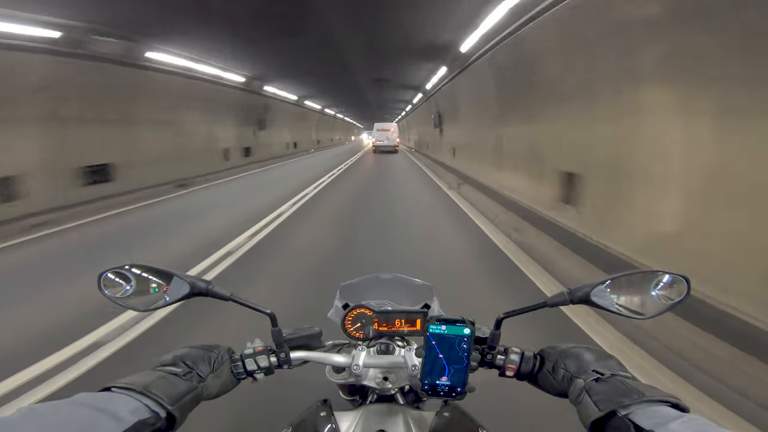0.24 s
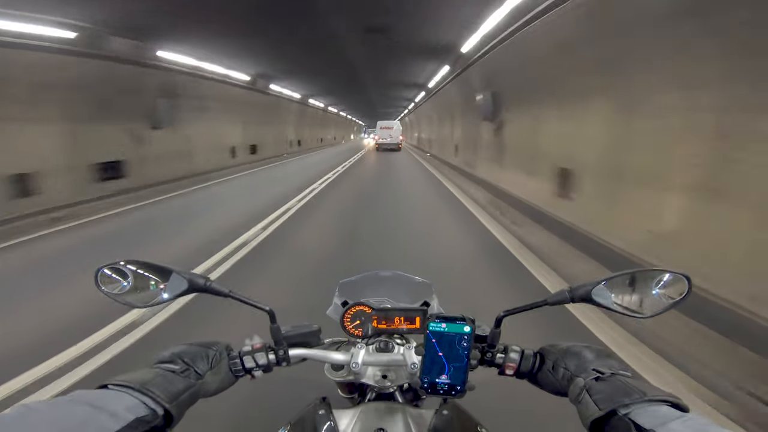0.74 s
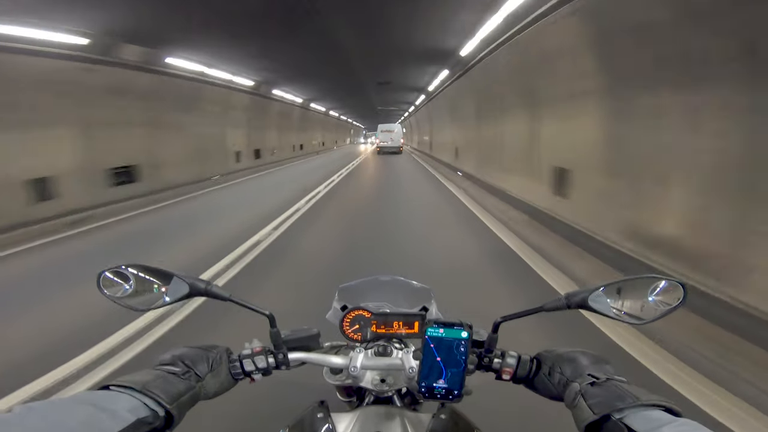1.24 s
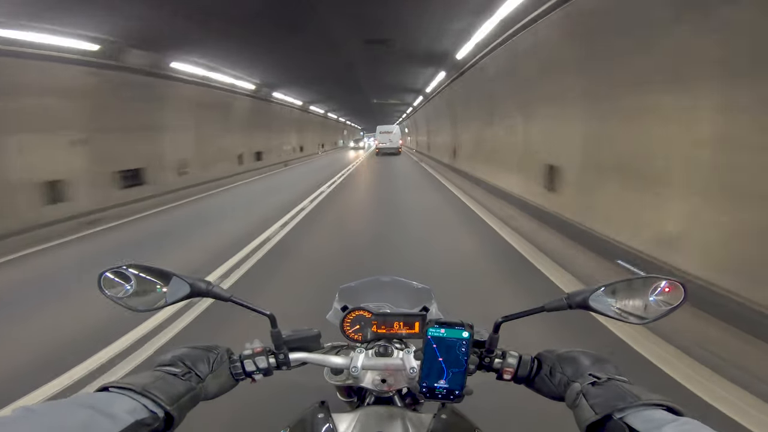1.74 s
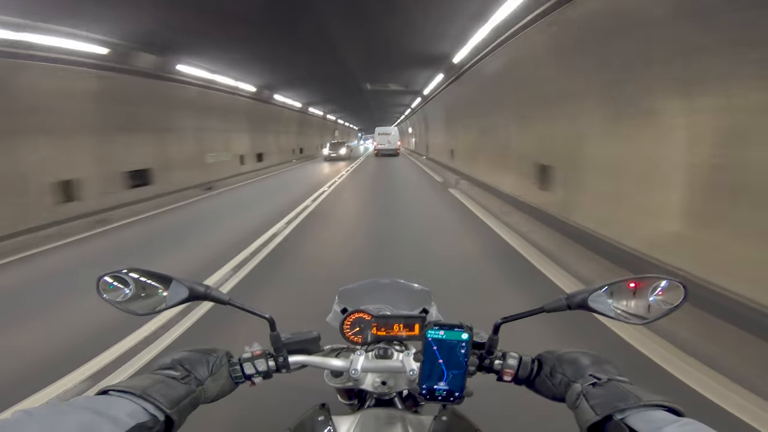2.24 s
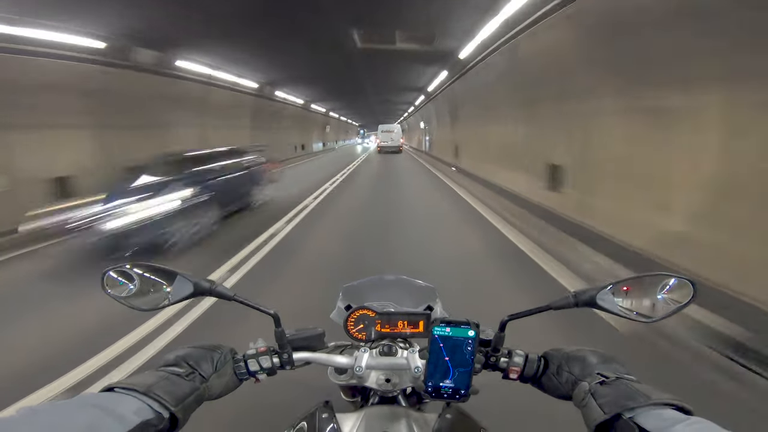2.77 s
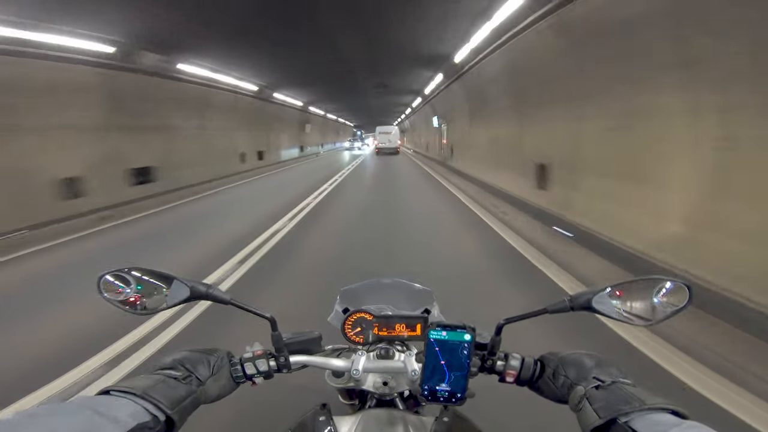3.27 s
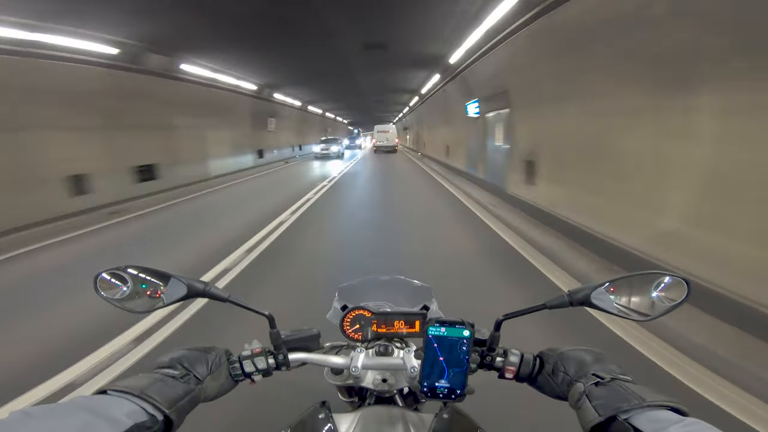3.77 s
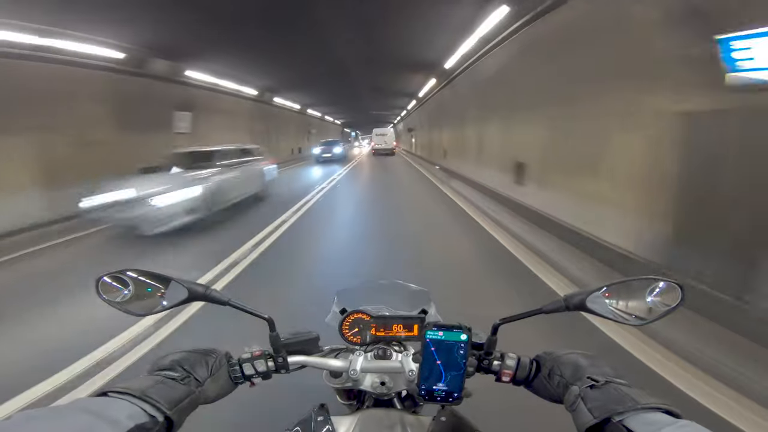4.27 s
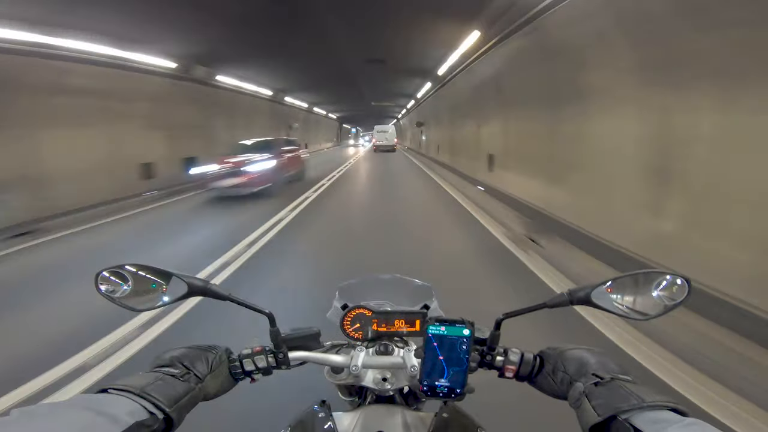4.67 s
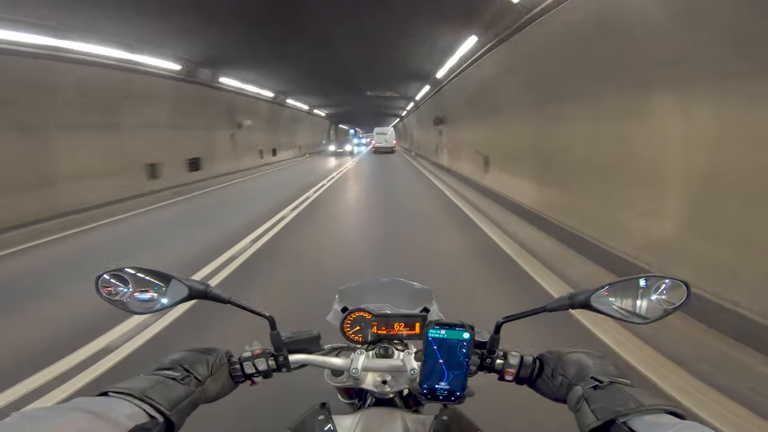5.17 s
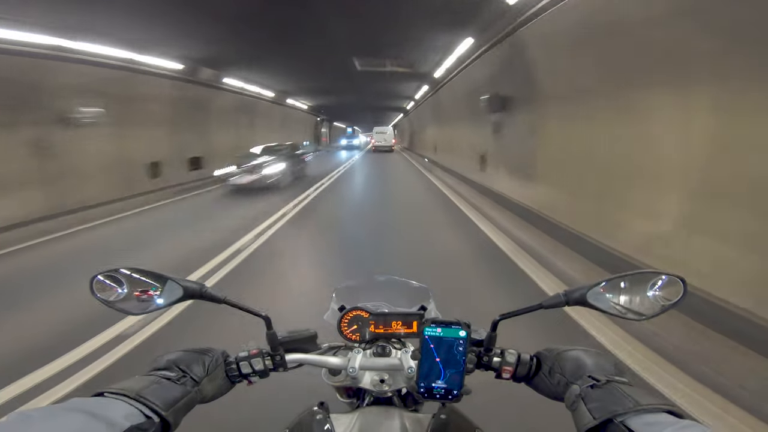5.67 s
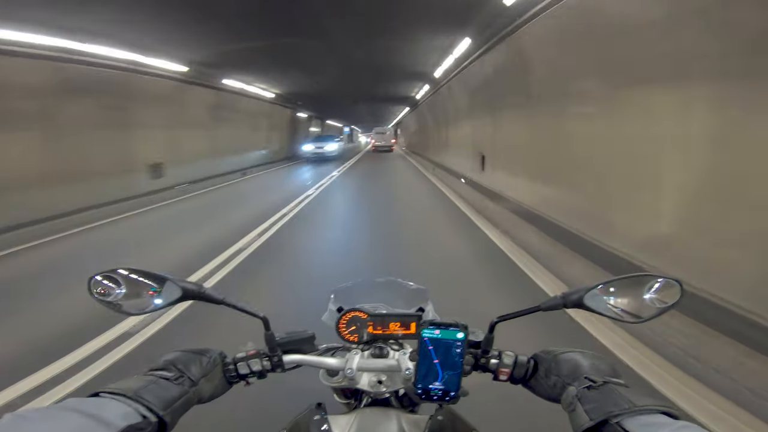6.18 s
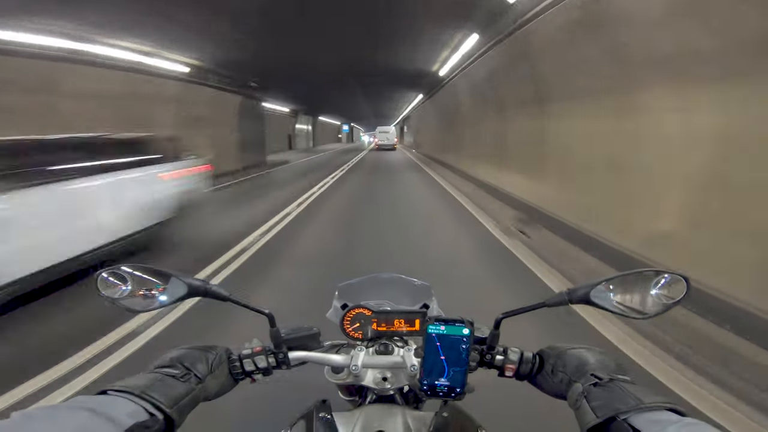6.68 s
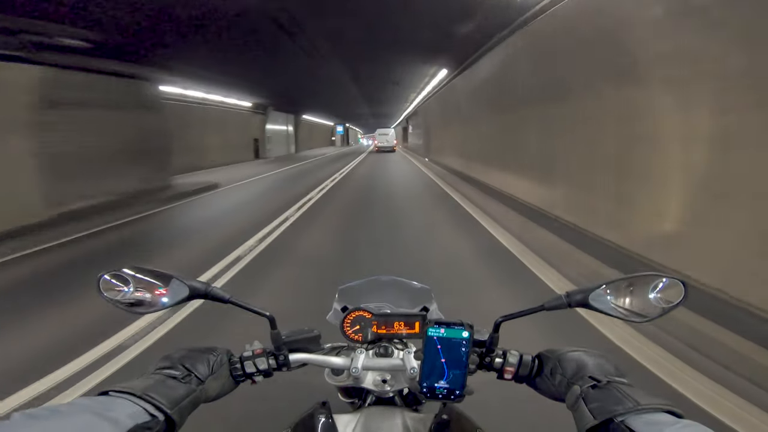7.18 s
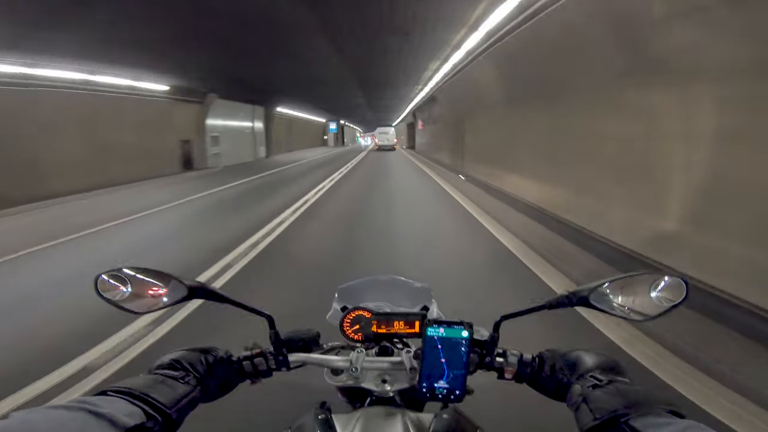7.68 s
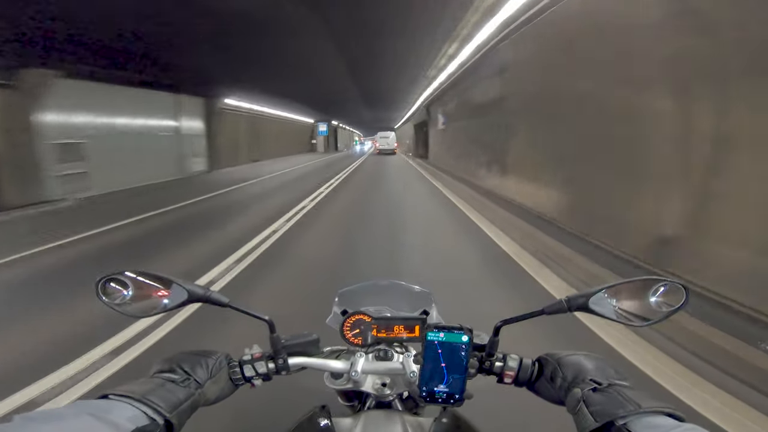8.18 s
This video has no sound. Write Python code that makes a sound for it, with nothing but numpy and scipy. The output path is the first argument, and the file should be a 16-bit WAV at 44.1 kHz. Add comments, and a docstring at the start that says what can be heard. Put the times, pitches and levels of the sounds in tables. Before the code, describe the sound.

A twin-cylinder motorcycle cruises through a road tunnel, heard from the rider's chest. The engine hums and growls, with light knocking, thin gear whine and ticking valves. Tyre roar fills the tunnel and wind thumps on the microphone. Five oncoming cars rush past slightly to the left. In the second half the throttle opens, and the engine note slowly climbs and hardens into a pulsing drone.

```python
"""A road tunnel, stereo microphone on the chest of a motorcyclist. At first the twin cruises just below:
the firings hum and knock, the airbox growls, gears whine and valves tick. Tyre roar fills the tube and
wind thumps on the microphone. From about 3 s five oncoming cars rush by on the left. Near 5 s the throttle
rolls open and the revs creep up; the note hardens to a drone, beating with the teeth of the final drive."""
import sys
import numpy as np
from scipy.fft import rfft, irfft, next_fast_len
from scipy.io import wavfile
from scipy.ndimage import uniform_filter1d, map_coordinates

SR = 44100
rng = np.random.default_rng(int(sys.argv[2]) if len(sys.argv) > 2 else 0)


def store_wav(level_fs):
    """Save 16-bit WAV to argv[1]."""
    pcm = np.round(np.clip(np.atleast_2d(level_fs), -1, 1) * 32767)
    wavfile.write(sys.argv[1], SR, pcm.T.astype(np.int16))


N = 371322
TIME = np.arange(N) / SR


def amp(db):
    """Decibels to gain."""
    return 10 ** (np.asarray(db) / 20)


def unit(x):
    """Scale to rms 1."""
    return x / np.sqrt(np.mean(x ** 2) + 1e-20)


def along(points, hz):
    """Read (f/Hz, value) points on a log frequency axis."""
    f, v = np.transpose(points)
    return np.interp(np.log(hz + 1), np.log(f + 1), v)


def wobble(rate):
    """A smooth random curve, rate knots a second."""
    knots = rng.standard_normal(int(N * rate / SR) + 4)
    coarse = np.arange(0, N + 64, 64)
    return np.interp(np.arange(N), coarse, map_coordinates(knots, [coarse * rate / SR]))


def swell(middle_s, width_s):
    """A bell-shaped rise and fall, 1 at its top."""
    return np.exp(-((TIME - middle_s) / width_s) ** 2)


def filtered(x, response):
    """Pass x through a complex frequency response."""
    m = next_fast_len(N + SR // 2)
    return irfft(rfft(x, m) * response(np.fft.rfftfreq(m, 1 / SR)), m)[..., :N]


def resonances(modes, f):
    """Causal response of (f/Hz, width/Hz, level/dB) modes."""
    return sum((-1) ** k * amp(db) * 1j * f * w / (c * c - f * f + 1j * f * w)
               for k, (c, w, db) in enumerate(modes))


def ringing(modes, f):
    """Gain of unrelated (f/Hz, width/Hz, level/dB) modes, added in power."""
    return np.sqrt(sum(amp(db) ** 2 / (1 + ((f - c) / (w / 2)) ** 4) for c, w, db in modes))


def stereo_noise(spread):
    """White noise common to both microphone ports, plus spread times each port's own."""
    return rng.standard_normal(N) + spread * rng.standard_normal((2, N))


CRUISE_HZ = 41.88  # crank turns a second at the start
def crank_speed(sag_hz_per_s, pull_s, pull_hz_per_s, ease_s):
    """Turns a second: a slow sag, overtaken by a steady climb as the engine pulls."""
    pulling_s = ease_s * np.logaddexp(0, (TIME - pull_s) / ease_s)
    return CRUISE_HZ - sag_hz_per_s * TIME + pull_hz_per_s * pulling_s


# The rider's twist grip: t/s, opening/0-1
TWIST_GRIP = [(0, 0.01), (2, 0.07), (3.4, 0.08), (4.7, 0.11), (5.4, .22), (5.95, .46), (6.45, .58),
              (6.85, 0.81), (7.3, 0.88), (7.95, 1), (8.4, 0.9)]
def throttle_opening():
    """Held nearly shut, rolled on to wide open, then eased a little."""
    return np.clip(np.interp(TIME, *np.transpose(TWIST_GRIP)), 0, 1)


# Engine note at the chest: multiple of crank speed, level/dB shut, half open, wide open, left-right/dB
ENGINE_ORDERS = [(1, -44.5, -40.5, -37.5, -0.5), (2, -35, -33.5, -32, 1), (3, -40, -33.5, -33.5, -0.5),
                 (3.5, -48, -57.5, -43.5, 1.5), (4, -39.5, -45, -46, 4.5), (5, -53, -48.5, -42.5, 1.5),
                 (5.5, -48.5, -43, -39, -3), (6, -41.5, -34.5, -33.5, 1.5), (6.5, -47.5, -53.5, -58, 7),
                 (7, -45.5, -42, -32.5, -4.5), (7.5, -51.5, -43, -52.5, -4), (8, -43, -43.5, -32, -9),
                 (8.5, -52, -53.5, -38, -4), (9, -49.5, -39.5, -52, 0.5), (10, -43, -43.5, -50, -4)]
# Brief dips of the fifth order and above: t/s, level/dB, half width/s
UPPER_DIPS = [(1.3, -5.5, .2), (3.1, -7, 0.18)]
def engine_note(turns, throttle, flutter_db, burble_db, sway, smear, lag_s):
    """One firing a turn gives whole orders; the unequal cylinders add half orders."""
    out = np.zeros((2, N))
    dip_db = sum(db * swell(s, width) for s, db, width in UPPER_DIPS)
    wavering = 1 - .65 * throttle  # load steadies the note
    burble = burble_db * wavering * wobble(30)  # no two firings are equally strong
    for order, shut_db, half_db, open_db, lean_db in ENGINE_ORDERS:
        db = np.interp(throttle, [0, .5, 1], [shut_db, half_db, open_db])
        db += burble + dip_db * (order >= 5)
        # echoes off the passing walls make every line waver, the short waves most
        level = amp(db + flutter_db * wavering * np.sqrt(order) * wobble(12))
        drift = sway * order * wavering * wobble(6)
        # high orders arrive later, which smears each firing over the whole turn
        phase = 2 * np.pi * order * (turns - smear * order / 2) + drift
        phase += np.pi * (order % 1)  # half orders shift the firings' timing more than their size
        late = np.pi * order * CRUISE_HZ * lag_s  # the right port hears it first
        for side, sign in enumerate((1, -1)):
            out[side] += np.sqrt(2) * level * amp(sign * lean_db / 2) * np.cos(phase - sign * late)
    return out


def final_drive(turns, throttle, meshes_per_turn, db, open_db, flutter_db):
    """The drive teeth mesh just above the sixth order and beat against it, louder when pulling."""
    level = amp(db + open_db * np.sqrt(throttle) + flutter_db * wobble(4.1))
    return np.sqrt(2) * level * np.cos(2 * np.pi * meshes_per_turn * turns + 0.34 * wobble(3.5))


# Gear and cam chain tones: multiple of crank speed, level/dB shut, half open, wide open
GEAR_ORDERS = [(19.4, -58.5, -64.5, -69.5), (19.7, -68.5, -60, -54), (28.5, -60.5, -64, -64.5),
               (31.86, -67, -61, -60.5), (32.9, -64, -63.5, -57.5), (34.4, -63.5, -66, -68.5),
               (37.4, -58, -58.5, -67), (39.8, -75.5, -63, -62.5), (41.9, -68, -63, -63),
               (46.2, -63, -59, -73), (63, -66, -67, -73), (69, -74, -73, -72), (91, -79, -78.5, -79),
               (121.5, -82.5, -87, -92)]
def gear_whine(turns, throttle, steady, rate_per_order, apart_rad):
    """Thin gear and chain tones follow the revs; the higher they lie, the faster they flutter."""
    out = np.zeros((2, N))
    for order, shut_db, half_db, open_db in GEAR_ORDERS:
        level = amp(np.interp(throttle, [0, .5, 1], [shut_db, half_db, open_db]))
        rate = rate_per_order * order
        flutter = (steady + wobble(rate) + 1j * wobble(rate)) / np.sqrt(steady ** 2 + 2)
        phase = 2 * np.pi * order * turns + np.angle(flutter)
        port_shift = apart_rad * wobble(22) * np.array([[1], [-1]])
        out += np.sqrt(2) * level * abs(flutter) * np.cos(phase + port_shift)
    return out * amp([[-1], [1]])


# Airbox resonances, close under the microphone: f/Hz, width/Hz, relative level/dB
AIRBOX_MODES = [(259, 40, -2), (338.5, 84, -4), (414.3, 42, -6)]
# Brief surges of the growl: t/s, level/dB
GROWL_SURGES = [(.12, 5), (.91, 6.5), (1.25, 7.5), (1.64, 7), (1.79, 4), (2.53, 6), (2.9, 9.5), (3.6, 2),
                (3.87, 7), (4.68, 3), (4.81, 3), (5.58, 5)]
def intake(turns, throttle, db, open_db, decay_turns, echo, surge_db, lope, muffle_hz):
    """Each intake stroke gulps a ragged puff of air that rings the airbox."""
    puffs = (echo + np.exp(-(turns % 1) / decay_turns)) * rng.standard_normal(N)
    growl = unit(filtered(puffs, lambda hz: resonances(AIRBOX_MODES, hz) / (1 + (hz / muffle_hz) ** 4)))
    growl *= 1 + lope * np.cos(np.pi * turns)  # one cylinder gulps harder than the other
    surging = surge_db * wobble(13) + sum(size * swell(s, width_s=0.032) for s, size in GROWL_SURGES)
    return growl * amp(db + open_db * throttle + surging) * amp([[-1.2], [1.2]])


# Cylinder block resonances: f/Hz, width/Hz, relative level/dB shut, wide open
BLOCK_MODES = [(1526, 140, 8.5, 13.5), (1783, 130, 6, 10), (1904, 71, 6.5, 9), (2028, 100, 4.5, 5.5),
               (2188, 140, -1, 3), (2360, 150, -3, -9)]
def combustion(turns, throttle, db, decay_turns, echo, spread):
    """Each firing knocks on the block; load brings out its lower resonances."""
    knocks = (echo + np.exp(-(turns % 1) / decay_turns)) * stereo_noise(spread)
    shut_modes = [(hz, width, shut_db) for hz, width, shut_db, _ in BLOCK_MODES]
    open_modes = [(hz, width, open_db) for hz, width, _, open_db in BLOCK_MODES]
    light = filtered(knocks, lambda hz: ringing(shut_modes, hz))
    loaded = filtered(knocks, lambda hz: ringing(open_modes, hz))
    return (light + throttle * (loaded - light)) / light.std() * amp(db) * amp([[-1.2], [1.2]])


# Valve and chain contacts: place in the four-stroke cycle/0-1, relative level/dB
VALVE_CONTACTS = [(.07, -5), (.34, -8), (.56, -10.5), (.69, -9.5), (.88, -9)]
# Valve and chain cover resonances: f/Hz, width/Hz, relative level/dB
COVER_MODES = [(2533, 170, -0.5), (2627, 60, -0.5), (2836, 150, -3), (3250, 160, -13.5), (3450, 140, -6.5),
               (3757, 140, -9), (3920, 130, -13.5), (4180, 200, -19.5), (4450, 220, -18.5),
               (4810, 130, -23.5), (5060, 120, -16), (5530, 150, -24.5), (5860, 140, -25.5),
               (6060, 130, -21.5), (6440, 160, -28), (6900, 160, -31.5), (7190, 260, -30),
               (8350, 300, -39.5), (8760, 180, -38.5), (9500, 340, -37.5)]
# Spectrum of a valve tick: f/Hz, relative level/dB
TICK_SPECTRUM = [(1000, -22), (2500, 5), (4000, -5.5), (6000, -8), (8300, -13.5), (9300, -16.5),
                 (10300, -21), (12000, -16.5), (13400, -21.5)]
def valve_gear(turns, throttle, ring_db, tick_db, open_db, decay_cycles, scatter_db, chain, spread):
    """Valves seat at set points of the cycle over the whirr of the chain; they tick and ring the covers."""
    cycles = turns / 2
    blows = np.full(N, chain)
    for place, db in VALVE_CONTACTS:
        since = cycles - place + 1
        sizes = amp(db + scatter_db * rng.standard_normal(size=256))
        blows += sizes[since.astype(int)] * np.exp(-(since % 1) / decay_cycles)
    rattle = blows * stereo_noise(spread)
    ring = unit(filtered(rattle, lambda hz: ringing(COVER_MODES, hz))) * amp([[-1], [1]])
    ticks = unit(filtered(blows * rng.standard_normal(N), lambda hz: amp(along(TICK_SPECTRUM, hz))))
    return amp(ring_db) * ring + amp(tick_db + open_db * throttle) * ticks


# Likeness of the tunnel's sound at the two ports: f/Hz, coherence/0-1
PORT_COHERENCE = [(60, .9), (93, .82), (150, 1), (230, .75), (350, 0.63), (550, 0.92), (850, 0.83),
                  (1330, 0.66), (2060, 0.76), (3210, .72)]
# Its balance: f/Hz, left-right/dB
PORT_BALANCE = [(60, 5), (86, -2), (120, 3), (180, -4.5), (260, 0.5), (370, 0), (530, -2), (760, -2),
                (1080, -1.5), (1560, 0), (2240, -4), (3210, -3.5)]
# Its phase: f/Hz, lead of the left port/rad
PORT_LEAD = [(120, -0.0083), (260, -0.42), (370, -0.24), (480, -.4), (600, -.2), (900, 0.12), (1300, 0.071),
             (3200, -.5), (5000, 0)]
def tunnel_noise(spectrum):
    """Noise of rms 1 arriving from the tube, as the two microphone ports pick it up."""
    def mid_and_side(hz):
        angle = np.arccos(np.clip(along(PORT_COHERENCE, hz), -1, 1)) / 2
        return amp(along(spectrum, hz)) * np.array([np.cos(angle), np.sin(angle)])

    def placing(hz):
        halves = np.array([[.5], [-.5]])
        return amp(halves * along(PORT_BALANCE, hz)) * np.exp(1j * halves * along(PORT_LEAD, hz))
    mid, side = filtered(rng.standard_normal((2, N)), mid_and_side)
    return unit(filtered(np.array([mid + side, mid - side]), placing))


# Tyres and traffic, all around in the tube: f/Hz, relative level/dB
ROAR_SPECTRUM = [(30, -15.5), (100, -3.5), (200, 1.5), (270, 2), (450, 1.5), (610, 1.5), (690, -2.5),
                 (800, -1), (900, -1.5), (960, -4), (1200, -6), (1300, -10.5), (1500, -11), (1650, -18),
                 (3000, -33), (13000, -81.5)]
def tunnel_roar(turns, db, traffic_db, throb):
    """Tyre noise and engine echoes pile up between the walls, louder amid the traffic."""
    level = amp(db + traffic_db * swell(middle_s=6.26, width_s=2.9))
    firing_throb = 1 + throb * np.cos(2 * np.pi * turns)
    return tunnel_noise(ROAR_SPECTRUM) * level * firing_throb


# Slipstream right on the microphone: f/Hz, relative level/dB
BUFFET_SPECTRUM = [(8, -27.5), (20, -3.5), (33, 3), (55, 0.5), (100, -4.5), (200, -16), (600, -34),
                   (2000, -87)]
# A gust's dull thump: f/Hz, relative level/dB
THUMP_SPECTRUM = [(8, -25.5), (20, -0.5), (33, 7), (55, -3), (105, -6), (150, -14), (300, -31.5),
                  (1000, -72.5), (4000, -130)]
# Gusts that hit the microphone: t/s, peak level/dB, half width/s
GUST_HITS = [(.2, -33.5, 0.13), (1.25, -36.5, 0.2), (2.0, -32.5, 0.17), (2.93, -28, .07),
             (3.08, -28, 0.086), (3.47, -30.5, 0.13), (4.24, -30.5, 0.099), (4.78, -37, .04),
             (5.6, -35.5, 0.044), (6.17, -26, 0.07), (6.3, -32.5, .08), (6.92, -31, .1), (7.11, -29, 0.028),
             (7.66, -28, .045), (8.41, -33, 0.085)]
def wind(slipstream_db, swing_db, spread):
    """Eddies off the screen buffet both ports nearly alike; short gusts thump over the slipstream."""
    def eddies(spectrum):
        return unit(filtered(stereo_noise(spread), lambda hz: amp(along(spectrum, hz))))
    slipstream = eddies(BUFFET_SPECTRUM) * amp(slipstream_db + swing_db * wobble(7))
    churn = eddies(THUMP_SPECTRUM)
    churn_power = abs(uniform_filter1d(np.mean(churn ** 2, axis=0), size=4096))
    churn /= np.sqrt(churn_power + 1e-9)  # even, so each gust hits with its full strength
    gusts = churn * np.sqrt(sum(amp(db) ** 2 * swell(s, width) for s, db, width in GUST_HITS))
    return (slipstream + gusts) * amp([[.5], [-.5]])


# Cars alongside, one lane to the left: t/s
CAR_PASSES = [2.9, 4.42, 4.9, 5.88, 6.65]
# Their tyre rush: f/Hz, relative level/dB
RUSH_SPECTRUM = [(150, -25), (500, 2), (720, 5.5), (880, 10), (1080, 7), (1600, -16), (3000, -22),
                 (8000, -55)]
def oncoming_cars(db, approach_s, recede_s):
    """Each car's tyre rush swells as 1 / distance and lingers in the tube behind it."""
    power = sum(1 / (1 + ((TIME - s) / np.where(TIME < s, approach_s, recede_s)) ** 2)
                for s in CAR_PASSES)
    return tunnel_noise(RUSH_SPECTRUM) * np.sqrt(power) * amp(db) * amp([[1.5], [-1.5]])


def scene():
    """Close by, the crank angle times every engine sound; roar, wind and cars lie around it."""
    turns = np.cumsum(crank_speed(sag_hz_per_s=.128, pull_s=4.767, pull_hz_per_s=1.52, ease_s=.573)) / SR
    throttle = throttle_opening()
    mix = engine_note(turns, throttle, flutter_db=0.94, burble_db=0.9, sway=0.045, smear=0.11066,
                      lag_s=0.00034)
    mix += final_drive(turns, throttle, meshes_per_turn=6.135, db=-54, open_db=14.5, flutter_db=4)
    mix += gear_whine(turns, throttle, steady=0.7, rate_per_order=0.9, apart_rad=0.4)
    mix += intake(turns, throttle, db=-37, open_db=-4.5, decay_turns=0.82, echo=0.75, surge_db=1.45,
                  lope=0.41, muffle_hz=1200)
    mix += combustion(turns, throttle, db=-49, decay_turns=0.14, echo=1.3, spread=0.91)
    mix += valve_gear(turns, throttle, ring_db=-57.5, tick_db=-67.5, open_db=2, decay_cycles=0.079,
                      scatter_db=3, chain=0.47, spread=0.97)
    mix += tunnel_roar(turns, db=-32, traffic_db=1.5, throb=0.04)
    mix += oncoming_cars(db=-42.5, approach_s=0.24, recede_s=0.71)
    return mix + wind(slipstream_db=-39, swing_db=3, spread=.14)


def record(dry, top_hz=13700, fade_s=.004):
    """The chest camera keeps nothing above its band limit; the sound starts without a click."""
    fade_in = np.minimum(TIME / fade_s, 1)
    return filtered(dry * fade_in, lambda hz: hz < top_hz)


dry = scene()
out = record(dry)
store_wav(out)
```